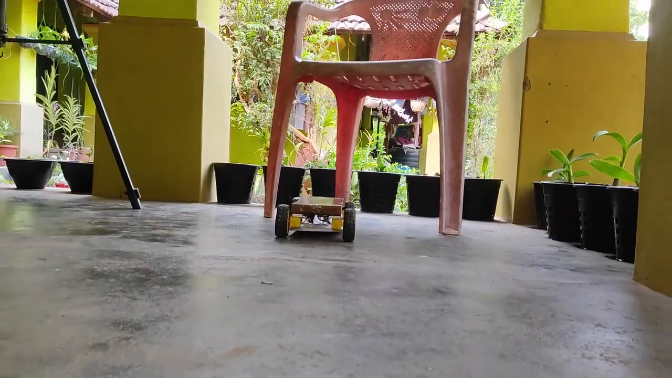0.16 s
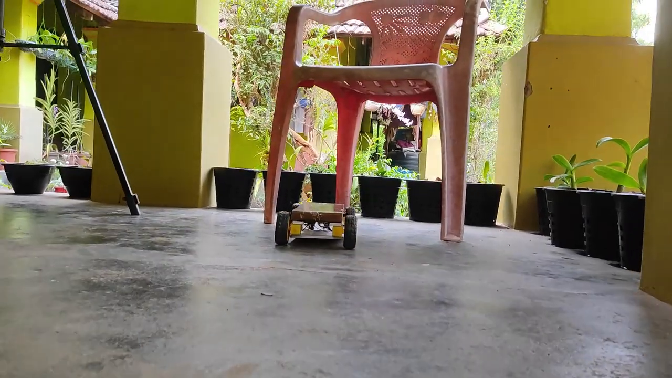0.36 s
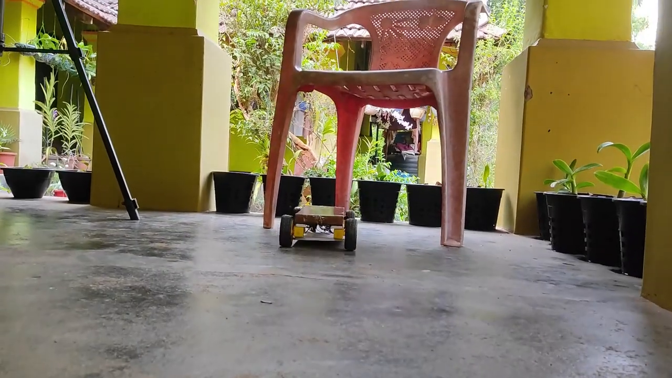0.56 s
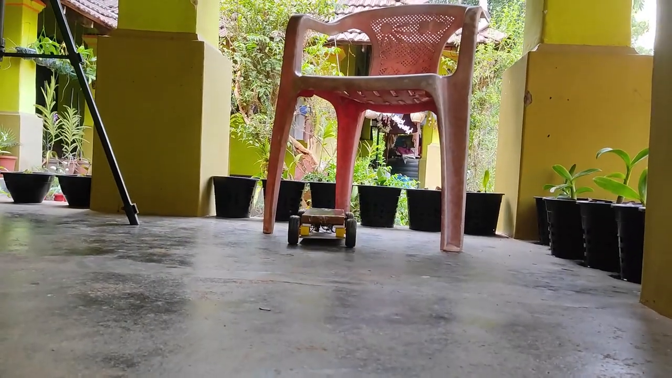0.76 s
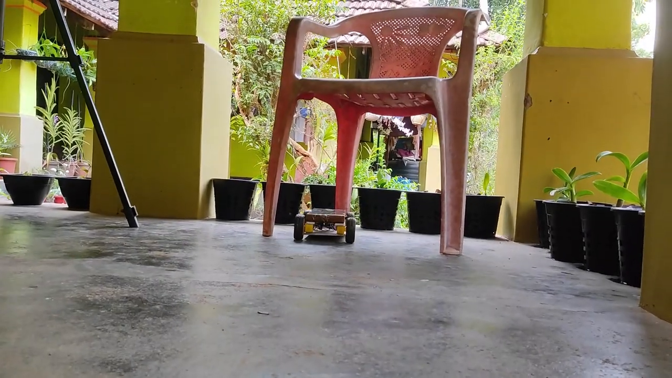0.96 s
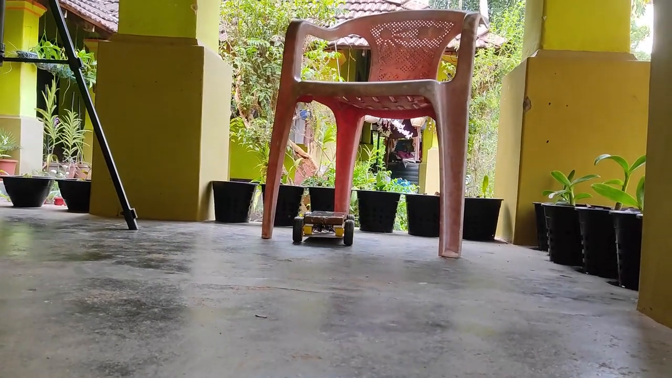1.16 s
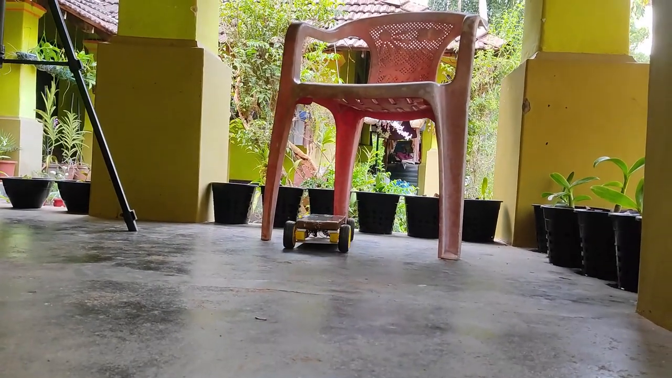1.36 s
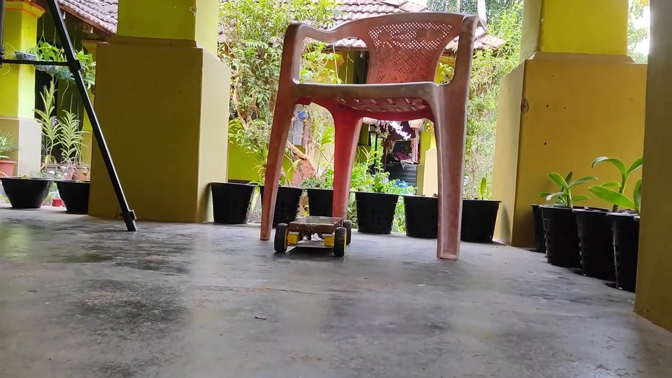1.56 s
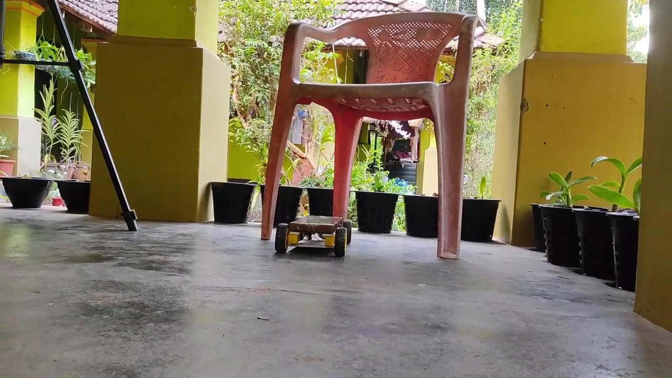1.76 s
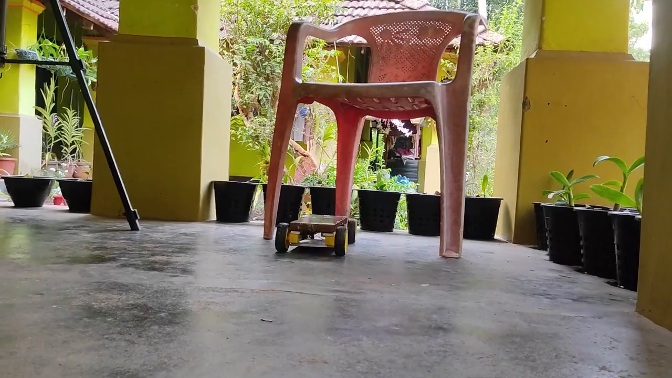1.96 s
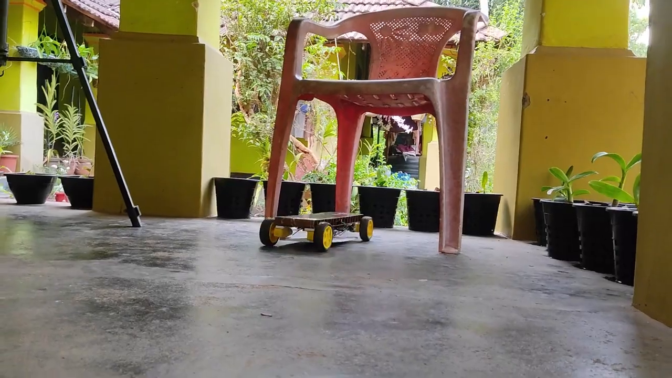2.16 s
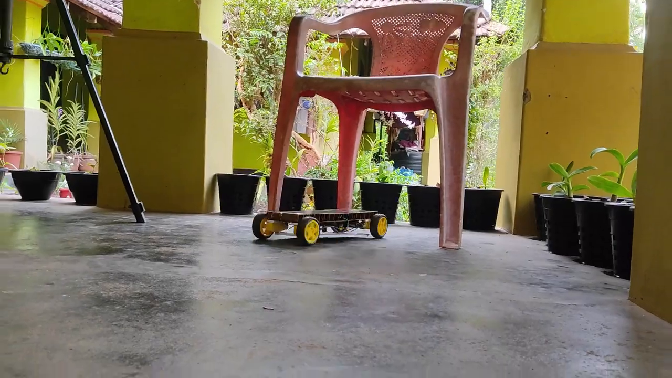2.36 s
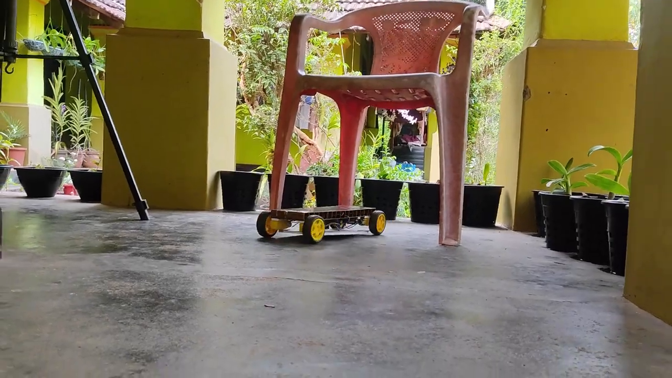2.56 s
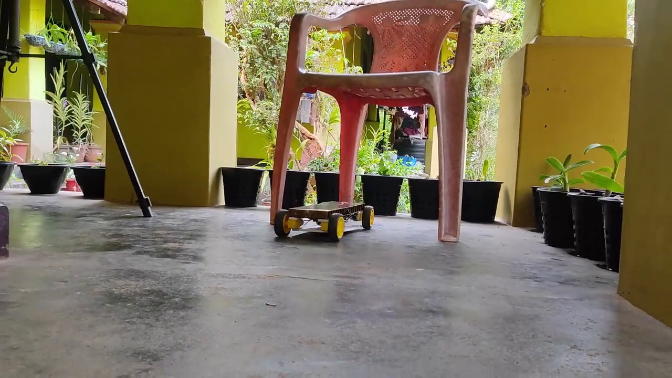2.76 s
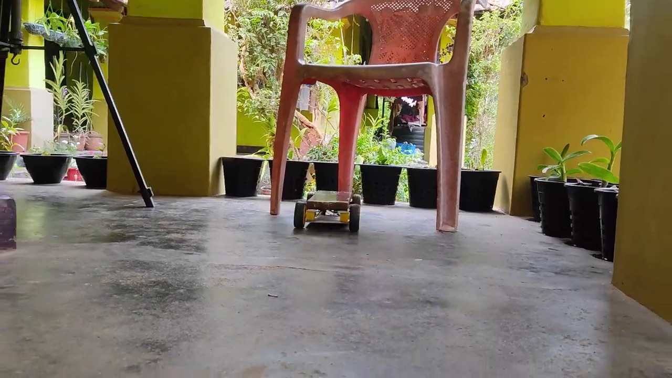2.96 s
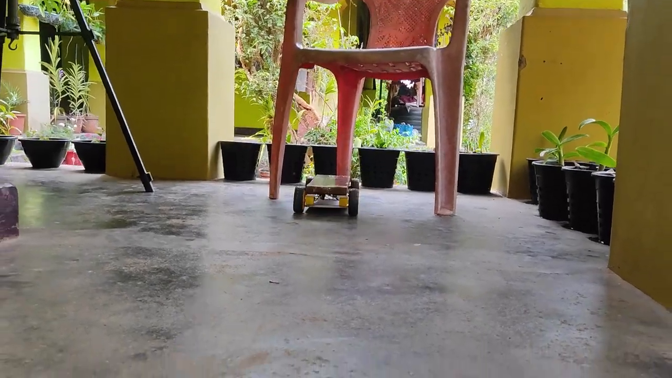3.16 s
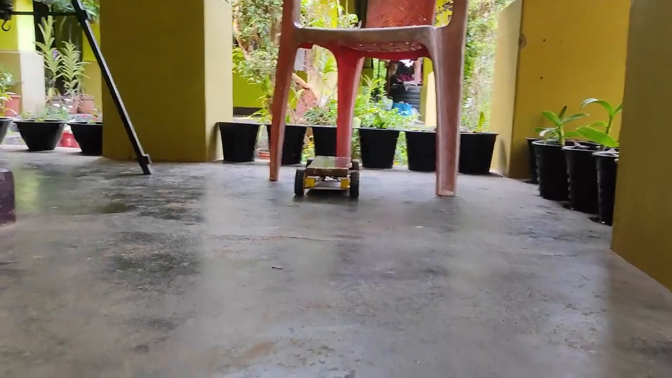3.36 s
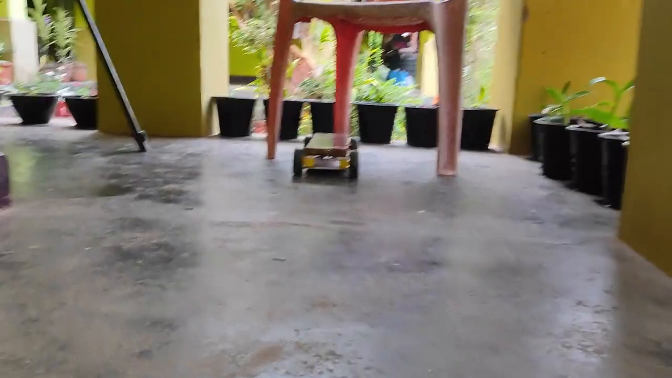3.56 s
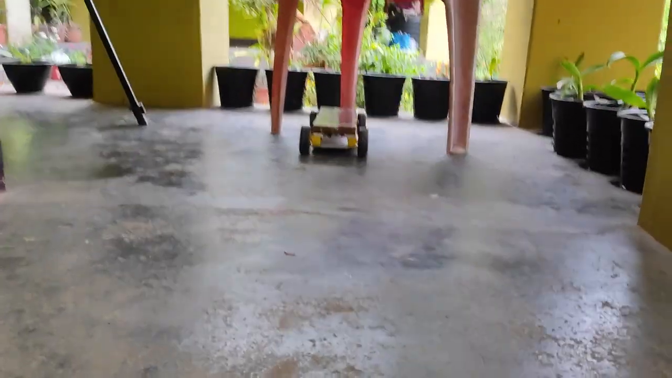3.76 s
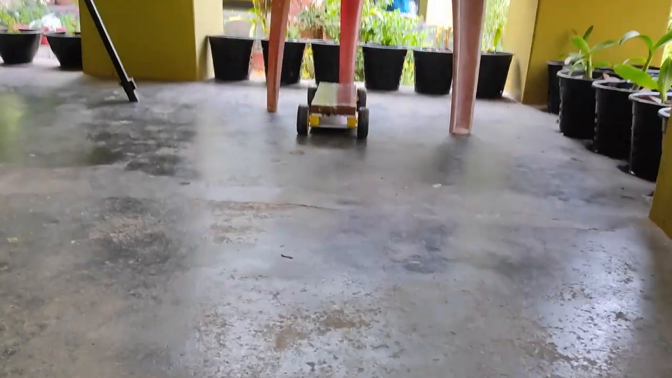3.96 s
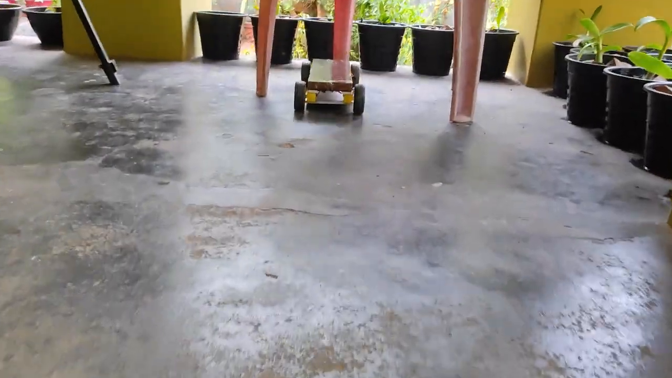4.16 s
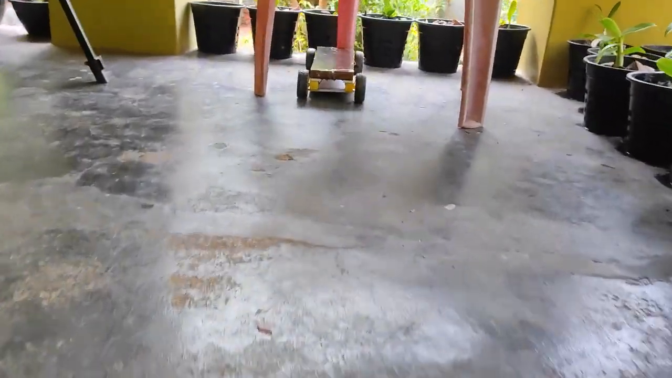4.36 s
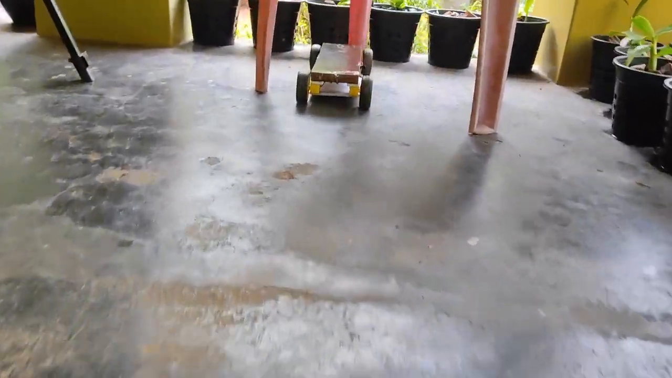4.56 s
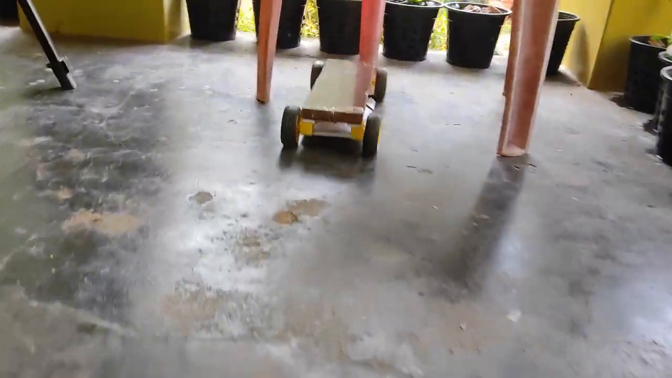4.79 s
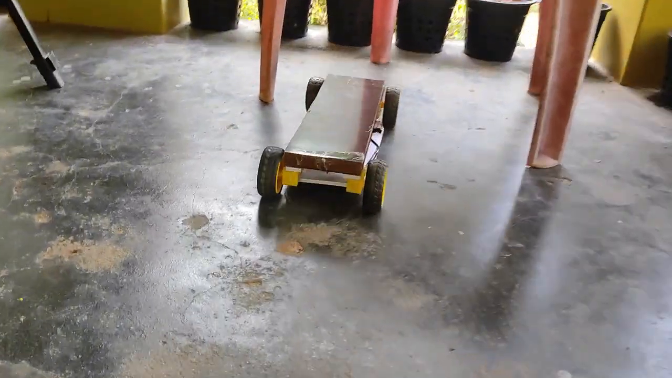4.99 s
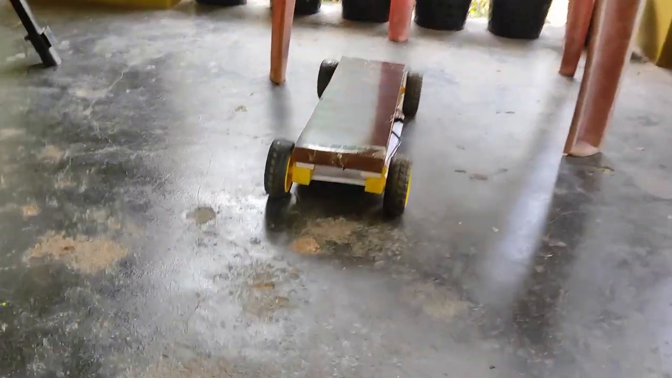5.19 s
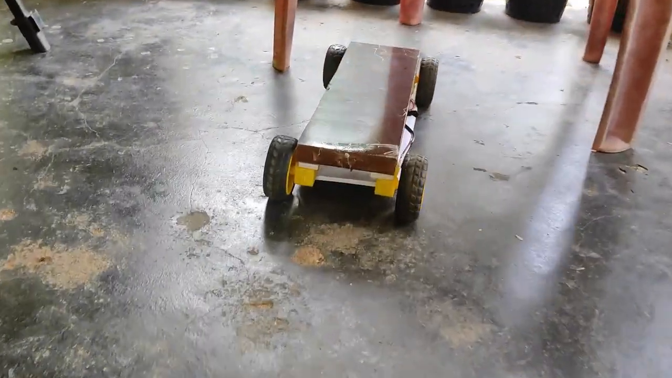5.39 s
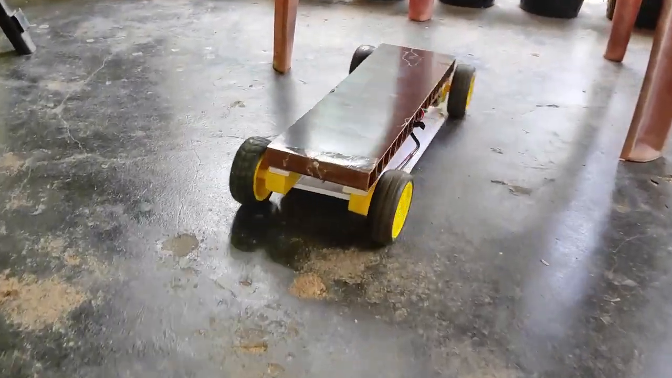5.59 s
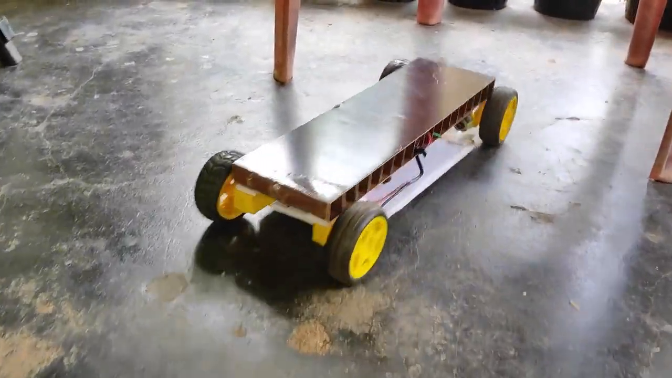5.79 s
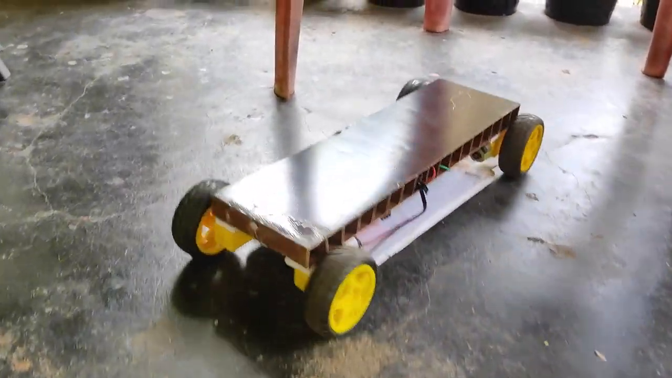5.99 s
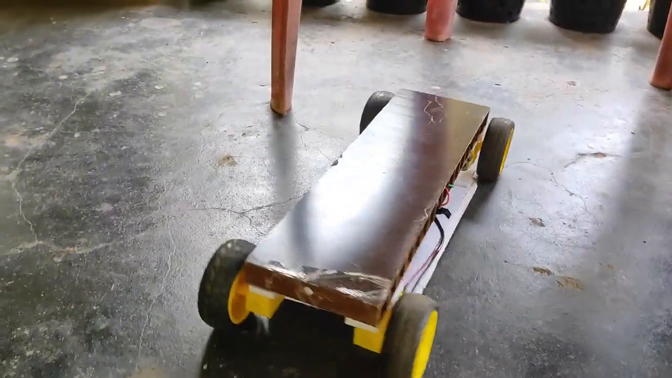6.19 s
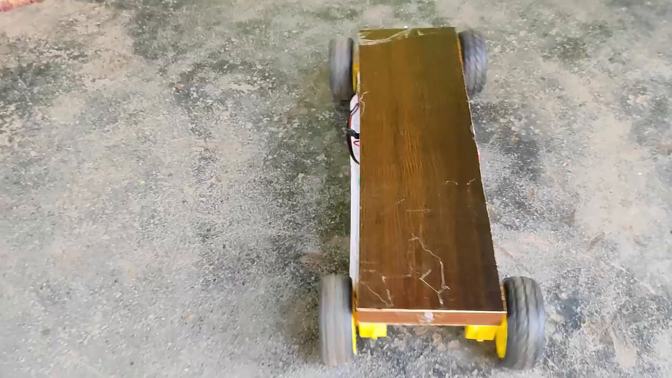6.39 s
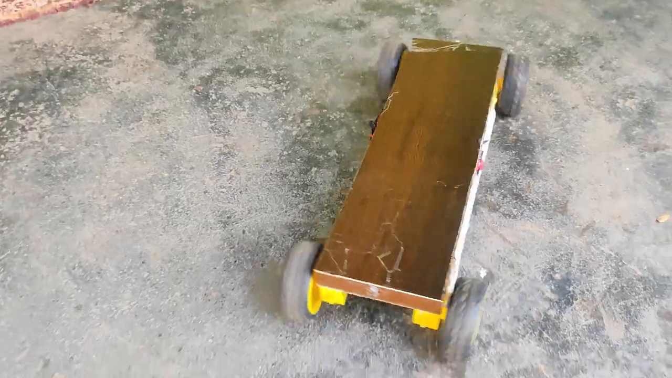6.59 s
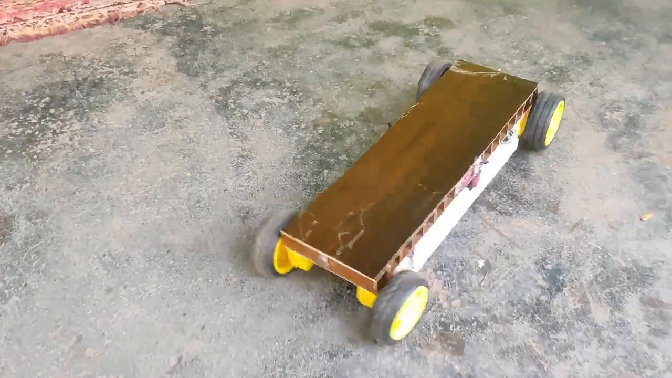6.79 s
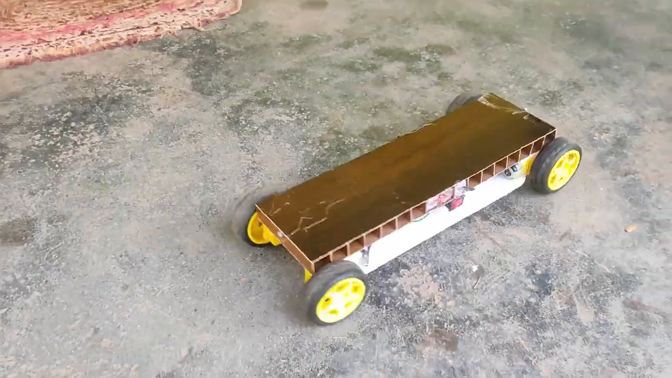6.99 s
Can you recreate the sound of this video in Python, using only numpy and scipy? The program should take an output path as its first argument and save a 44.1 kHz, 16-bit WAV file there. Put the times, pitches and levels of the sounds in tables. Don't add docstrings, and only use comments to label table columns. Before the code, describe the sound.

A small toy-like car with electric gear motors whines and rattles in short bursts on a concrete porch, once knocking a hollow plastic chair.

```python
import sys
import numpy as np
from scipy import signal
from scipy.fft import rfft, irfft, next_fast_len
from scipy.io import wavfile
from scipy.ndimage import uniform_filter1d

SR = 44100
rng = np.random.default_rng(int(sys.argv[2]) if len(sys.argv) > 2 else 0)


def digitize_waveform(pressure):
    field = np.atleast_2d(pressure).T
    bounded = np.clip(field, -1, 1)
    quanta = np.round(bounded * 32767).astype(np.int16)
    wavfile.write(sys.argv[1], SR, quanta)


def ratio(d):
    e = np.asarray(d, float) / 20
    return 10 ** e


N = 310464
TIME = np.arange(N) / SR

# f/Hz, level per Hz/dB
STREET = [(50, -33.5), (85, -7), (473, -22.5), (537, -20.5), (741, -22), (1090, -23.5), (1320, -29),
          (1440, -27.5), (4120, -35), (5450, -40.5), (7680, -40.5), (8550, -66), (14300, -51)]
STREET_DB = -61
# f/Hz, correlation/1
LIKENESS = [(60, -0.17), (230, 0.94), (910, 0.21), (3570, -0.52), (14000, -0.03)]
HUM_HZ, HUM_WIDTH_HZ = 49, 18
HUM_DB, WIND_DB, SELF_NOISE_DB = -61, -60.5, -75.5
# t/s, level/dB
INSECT = [(0, -105), (.3, -85), (1.8, -80), (3.2, -77), (3.6, -70), (3.9, -74.5), (5.3, -68.5),
          (7.04, -84.5)]
# t/s, length/s, start f/Hz, end f/Hz, level/dB
BIRDS = [
    (0, 0.33, 1175, 1373, -70),
    (0.239, 0.14, 796, 884, -68.5),
    (.26, 0.44, 2770, 2720, -76.5),
    (.3, 0.14, 1125, 1180, -71),
    (0.338, 0.27, 3180, 3120, -72.5),
    (0.404, 0.1, 2200, 2060, -69),
    (1.75, 0.325, 2900, 2800, -77.5),
    (3.43, 0.15, 1630, 1550, -74),
    (3.402, 0.42, 789, 817, -72.5),
]
# t/s, length/s, start f/Hz, end f/Hz, level/dB
HOARSE_BIRDS = [
    (0, 0.17, 3450, 3700, -75.5),
    (0.031, 0.083, 2730, 2800, -74),
    (3.41, 0.13, 3940, 3630, -67),
    (3.42, 0.22, 2730, 2730, -72),
    (5.34, 0.15, 3540, 3470, -65),
    (5.349, 0.19, 2600, 2590, -69.5),
    (5.34, .13, 5520, 5510, -73),
]
# t/s, length/s, start f/Hz, end f/Hz,
# level/dB
SHUFFLES = [
    (2.8, 0.181, 280, 140, -60.5),
    (2.826, 0.14, 330, 450, -57),
    (5.211, 0.045, 600, 320, -58.5),
    (4.52, 0.1977, 270, 100, -43),
]
# t/s, level/dB, length/s
TICKS = [
    (0.115, -50, 0.0014),
    (1.698, -50.5, 0.0083),
    (3.007, -30, 0.012),
    (3.456, -54.5, 0.036),
    (3.58, -56, 0.02),
    (3.96, -43.5, 0.015),
    (5.391, -61, 0.055),
]

# on t/s, off t/s, chassis level/dB, deck mode level/dB, hiss level/dB
POWERED = [
    (0.48, 0.979, -42, -42, -41),
    (0.984, 1.508, -43, -45.5, -44.5),
    (1.975, 2.482, -42, -40.5, -44.5),
    (2.499, 2.982, -42, -45, -47),
    (3.971, 4.475, -43, -42.5, -45.5),
    (4.524, 5.021, -41, -43.5, -44.5),
    (5.477, 5.965, -37.5, -35, -39.5),
    (5.998, 6.429, -36.5, -32, -40),
    (6.397, 6.802, -40.5, -26, -50),
    (6.759, 7.04, -39.5, -28.5, -48),
]
KICK_S, KICK_DB, SPIN_UP_S, SPIN_UP_DB = 0.031, 16, 0.074, 8
COAST_DB, COAST_S, HALT_DB_PER_S = 24.5, 0.099, 291
HALTS = [1.1, 1.715, 2.6, 3.07, 4.62, 5.15, 6.1, 6.5, 6.9, 7.2]
HISS_SPIN_UP, HISS_COAST = 1.82, 1.098
DECK_SPIN_UP, DECK_COAST = 0.83, 0.58
CAR_PAN_DB, PAN_SPIN_UP, PAN_COAST = -1.5, 0.2, -0.2
PICK_UP_S, PICK_UP_DB = 0.22, 12
# engage t/s, let go t/s, first order level/dB, third order level/dB, fifth order level/dB
LOADED = [(.585, .997, -36.5, -32.5, -37), (1.049, 1.521, -27.5, -38, -38.5), (2.051, 2.288, -41, -38, -43),
          (2.33, 2.49, -44.5, -35, -42.5), (2.532, 2.995, -31, -36.5, -36.5),
          (4.09, 4.484, -39.5, -33.5, -39), (4.556, 5.009, -27, -35, -35),
          (5.562, 5.965, -49, -24.5, -42.5), (6.109, 6.43, -25, -30.5, -30),
          (6.477, 6.763, -27.5, -29, -38.5), (6.806, 7.041, -28.5, -31.5, -38.5)]
# first order level/dB, third level/dB, fifth level/dB
TURNING = [(-5.5, -7, -10), (3, 6, 3.5), (-2, 0, -9), (9, 6, 6), (11, -1, -1.5), (2, 1, 0.5), (3, 1.5, 0),
           (-16, 1.5, -2), (-1.5, -10.5, 9), (-1, 0, -5), (-2, -1.5, 1)]
ENGAGE_S = 0.015
LET_GO_DB_PER_S = [
    [898],
    [380],
    [479],
]
# t/s, mesh f/Hz
SPEED = [
    [(.585, 1440), (.621, 1484), (.997, 1495)],
    [(1.058, 1406), (1.232, 1410), (1.362, 1459), (1.482, 1482), (1.52, 1402)],
    [(2.04, 1475), (2.074, 1414), (2.284, 1402)],
    [(2.33, 1463), (2.466, 1418), (2.505, 1447)],
    [(2.53, 1382), (2.712, 1427), (2.864, 1403), (2.974, 1442)],
    [(4.085, 1445), (4.271, 1503), (4.47, 1447)],
    [(4.562, 1442), (4.626, 1432), (4.84, 1488), (4.97, 1497), (5.01, 1446)],
    [(5.562, 1451), (5.768, 1377), (5.796, 1396), (5.995, 1426)],
    [(6.105, 1438), (6.137, 1489), (6.279, 1412), (6.43, 1413)],
    [(6.47, 1325), (6.785, 1332)],
    [(6.808, 1309), (6.882, 1349), (7.04, 1315)],
]
# speed spread/%, first order of the other motors relative to the loudest, level/dB
UNEVEN = [(.9, -4), (.7, -15), (1.1, -3), (1.1, -3), (.6, -15), (.95, -3), (.6, -14), (1.3, -2), (.75, -14),
          (.9, -10), (1.1, -8)]
# t/s, time constant/s
RUN_DOWN = [
    (1.51, 0.6),
    (2.985, 0.24),
    (4.482, 0.4),
    (5.008, 0.24),
]
# first order L-R level/dB, minor orders level/dB
FACING = [(0, 2), (1.5, 3.5), (-2, 6.5), (-0.5, 2), (-1.5, 2), (4, 2.5), (-1, 1.5), (5, -7.5), (-1, -1),
          (-16, -4.5), (-18, -3)]
# order/1, relative level/dB
WITH_THIRD = [(2, -9), (4, -13.5)]
# order/1, relative level/dB
WITH_FIFTH = [(6, -17), (7, -21), (8, -14), (9, -22)]
# f/Hz, level per Hz/dB
CHASSIS = [(250, -32), (600, -16.5), (1220, -11.5), (1430, 4.5), (1620, -8), (2200, -5), (3000, -3),
           (3700, -0.5), (4300, -2.5), (5000, -5.5), (6300, -7.5), (7500, -6.5), (8600, -11.5), (9400, -37)]
# f/Hz, level per Hz/dB
HISS = [(7500, -26), (8400, 5), (9900, -6.5), (12000, -6), (14200, -14.5), (14600, -59)]
DECK_HZ, DECK_WIDTH_HZ = 1680, 450
# t/s, length/s, start f/Hz, end f/Hz, level/dB
SQUEAL = [
    (2.98, .055, 4200, 3700, -43),
    (5.562, 0.1, 3600, 3420, -30.5),
    (6.52, 0.18, 3700, 5780, -48),
    (6.81, 0.38, 5300, 5800, -43),
    (6.56, .48, 6750, 6450, -43),
    (3.96, 0.24, 890, 1110, -59),
    (5.06, 0.12, 854, 603, -55.5),
]
# t/s, share/1
GRAZING = [(0, 0.97), (3.5, 0.67), (4.0, 0.57), (6.0, 0.54), (6.2, 0.76), (6.43, 0.34), (6.47, 0.2),
           (7.04, 0.25)]
# f/Hz, level/dB
FLOOR_NOTCH = [(20, 0), (8100, 0), (8400, -15), (9000, -20), (9550, -15), (9850, 0)]
# f/Hz, phase/rad
MIC_LEAD = [(0, 0), (3190, 0.5353), (8960, 3.5), (10700, 9), (11900, 8), (14100, -1.5)]
# f/Hz, L-R level/dB
MIC_TILT = [(1500, 1), (2500, -2.5), (4300, -4.5), (6500, -8), (9000, -2.5), (12500, -6.5)]
PORCH_T60_S, PORCH_DB = .24, -12
# t/s, peak level/dB
BUMPS = [
    (4.403, -17.5),
    (4.431, -43),
    (4.461, -19),
    (4.49, -16),
    (4.5, -32.5),
    (4.516, -30),
    (4.539, -31),
    (4.589, -31),
]
# f/Hz, level/dB, T60/s
CHAIR = [(112.2, -22, 0.25), (205.8, -4, 0.25), (298.9, -9.5, 0.065), (356, -4.5, 0.14), (420, -7, 0.046),
         (497, -6, 0.051), (563, -9, 0.032), (654, 5.5, 0.014), (710, -0.5, 0.025), (900, 4, 0.015),
         (950, -1, 0.018), (1170, 1, 0.014), (1550, 2.5, 0.011), (1960, 6, 0.011), (2600, 2, 0.011),
         (3340, -2, .008)]
# f/Hz, level/dB
MIC = [(20, 2.5), (60, 0), (110, -3.5), (220, 0), (14300, 0.5), (14420, -50)]
CUT_S, RESUME_S, FADE_S = 6.43, 6.469, 0.022


def rms_one(x):
    return x / np.sqrt(np.mean(x ** 2) + 1e-20)


def in_time(tables):
    return np.interp(TIME, *np.transpose(np.concatenate(tables)))


def per_burst(rows):
    burst = np.searchsorted([row[0] for row in LOADED], TIME, side="right") - 1
    return np.array(rows)[np.clip(burst, 0, None)].T


def short_of(since, length):
    return np.clip(1 - since / length, 0, 1)


def at_hz(points, hz):
    table_hz, values = np.transpose(points)
    return np.interp(np.log(hz + 1), np.log(table_hz), values)


def shaped(x, points, as_gain=ratio):
    size = next_fast_len(N + 8192)
    gain = as_gain(at_hz(points, np.fft.rfftfreq(size, 1 / SR)))
    return irfft(rfft(x, size) * gain, size)[..., :N]


def banded(x, order, hz, kind):
    return signal.sosfilt(signal.butter(order, hz, kind, fs=SR, output="sos"), x)


def drift(rate):
    r = np.exp(-16 * np.pi * rate / SR)
    noise = rng.standard_normal(N // 8 + 4002)
    slow = signal.lfilter([1], [1, -2 * r, r * r], noise)[4000:]
    return np.interp(np.arange(N) / 8, np.arange(len(slow)), rms_one(slow))


def pair(alike):
    shared, left, right = rng.standard_normal((3, N))
    alike = np.clip(alike, 0, 1)
    return np.sqrt(alike) * shared + np.sqrt(1 - alike) * np.array([left, right])


def panned(x, pan_db):
    gains = ratio(np.array([pan_db, -pan_db]) / 2)
    return x * gains / gains.mean(axis=0)


def street():
    shared, left, right = shaped(rng.standard_normal((3, N)), STREET)
    alike = shaped(shared, LIKENESS, lambda c: np.sqrt(np.clip(c, 0, 1)))
    apart = shaped(np.array([left, right]), LIKENESS, lambda c: np.sqrt(1 - np.clip(c, 0, 1)))
    return ratio(STREET_DB + 1.23 + 0.19 * drift(0.28)) * rms_one(alike + apart)


def hum():
    wavering = 0.76 + 0.76 * drift(HUM_WIDTH_HZ)
    drone = ratio(HUM_DB) * wavering * np.sin(2 * np.pi * HUM_HZ * TIME) * np.sqrt(2)
    wind = ratio(WIND_DB + 1.2 * drift(1.7)) * rms_one(banded(pair(0.61), 2, [14, 60], "band"))
    sheltered_db = -6 * (TIME > CUT_S)
    return ratio(sheltered_db) * (drone + wind)


def self_noise():
    return ratio(SELF_NOISE_DB + 2.4 * drift(6.6)) * banded(pair(.1), 2, 9000, "high")


def insects():
    band = banded(pair(0.16), 2, [7550, 8100], "band")
    level_db = np.interp(TIME, *np.transpose(INSECT)) + 2.7 * drift(29)
    return ratio(level_db) * rms_one(band)


def hoarse_notes(notes, hoarse_hz):
    out = np.zeros((2, N))
    for s, length, start_hz, end_hz, level_db in notes:
        along = np.clip((TIME - s) / length, 0, 1)
        phase = 2 * np.pi * np.cumsum(start_hz + (end_hz - start_hz) * along) / SR
        port_phase = np.array([[0], [rng.uniform(-1.1, .6)]])
        note = (40 / hoarse_hz + drift(hoarse_hz)) * np.sin(phase + port_phase)
        envelope = np.sin(np.pi * along ** 0.5) ** .5 * (along < 1)
        out += ratio(level_db + 4.0) * envelope * note
    return out


def scuffs():
    envelope = sum(ratio(db) * np.exp(-.5 * ((TIME - s) / length) ** 2) for s, db, length in TICKS)
    return envelope * 0.32 * banded(pair(0.28), 1, 2500, "high")


def power():
    on, off, chassis_db, deck_db, hiss_db = np.transpose(POWERED)[..., None]
    kick = KICK_DB * short_of(TIME - on, KICK_S) + 200 * (TIME < on)
    rise = SPIN_UP_DB * short_of(TIME - on - KICK_S, SPIN_UP_S)
    coast = COAST_DB * (1 - np.exp(-np.clip(TIME - off, 0, None) / COAST_S))
    coast = coast + HALT_DB_PER_S * np.clip(TIME - np.array(HALTS)[:, None], 0, None)
    chassis = chassis_db - kick - rise - coast
    deck = deck_db - kick - DECK_SPIN_UP * rise - DECK_COAST * coast
    hiss = hiss_db - kick - HISS_SPIN_UP * rise - HISS_COAST * coast
    pan = CAR_PAN_DB + PAN_SPIN_UP * rise + PAN_COAST * np.minimum(coast, 30)
    run = chassis.argmax(axis=0)
    levels = [layer[run, np.arange(N)] for layer in (chassis, deck, hiss, pan)]
    return uniform_filter1d(levels, size=120)


def load():
    on, off, *levels_db = per_burst(LOADED)
    along = np.clip((TIME - on) / (off - on), 0, 1) - .5
    engage_db = 20 * np.log10(1.0001 - short_of(TIME - on, ENGAGE_S))
    let_go_db = np.array(LET_GO_DB_PER_S) * np.clip(TIME - off, 0, None)
    levels_db = np.array(levels_db) + per_burst(TURNING) * along + engage_db - let_go_db
    return uniform_filter1d(levels_db, size=100)


def motors(mesh_hz):
    slowing = sum((TIME - s) / lag * (TIME > s) * (TIME < s + .08) for s, lag in RUN_DOWN)
    spread = per_burst(UNEVEN)[0] / 100 + .3 * slowing
    phases = []
    for k in range(4):
        wander = (k > 0) * 1.6 * drift(4) + (.4 + .1 * k) * drift(70)
        speed = mesh_hz * np.exp(-slowing * (.9 + .2 * k)) * (1 + spread * wander)
        phases.append(2 * np.pi * np.cumsum(speed) / SR)
    return phases


def order(phases, multiple, others_db, roughness):
    out = np.zeros((2, N))
    mean_power = (1 + 3 * ratio(others_db) ** 2) * (1 + roughness ** 2)
    for k, phase in enumerate(phases):
        size = ratio(others_db * (k > 0)) * (1 + roughness * drift(130))
        size = size * (1 + .15 * np.cos(phase / 10 + rng.uniform(0, 6)))
        offset = rng.normal(0, 0.6) * np.sqrt(multiple)
        out += size * np.sin(multiple * phase + rng.uniform(0, 6.17) + np.array([[offset], [-offset]]))
    return out * np.sqrt(2 / mean_power)


def whine(phases, first_db, third_db, fifth_db, pan_db):
    first_pan_db, minor_db = per_burst(FACING)
    first = ratio(first_db - .6) * order(phases, 1, per_burst(UNEVEN)[1], roughness=.18)
    upper = ratio(third_db - 2) * order(phases, 3, -5, roughness=.5)
    upper += ratio(fifth_db - 2.5) * order(phases, 5, -4, roughness=.8)
    for led_db, orders in [(third_db, WITH_THIRD), (fifth_db, WITH_FIFTH)]:
        for multiple, db in orders:
            upper += ratio(led_db + minor_db + db) * order(phases, multiple, -3, roughness=.9)
    return panned(first, first_pan_db) + panned(upper, pan_db)


def rattle(phases, chassis_db, deck_db, hiss_db, pan_db):
    turn = 1 + .2 * np.cos(phases[0] / 10) + .3 * np.cos(phases[1])
    teeth = turn * ratio(1.8 * drift(250) + .5 * drift(12))
    w, r = 2 * np.pi * DECK_HZ / SR, np.exp(-np.pi * DECK_WIDTH_HZ / SR)
    deck = teeth * pair(0.36)
    for _ in range(2):
        deck = signal.lfilter([1, 0, -1], [1, -2 * r * np.cos(w), r * r], deck)
    deck = ratio(deck_db - 6.0) * rms_one(deck)
    chassis = ratio(chassis_db + 6.5) * rms_one(shaped(teeth * pair(0.55), CHASSIS))
    hiss = ratio(hiss_db + 5.6) * rms_one(shaped(np.sqrt(teeth) * pair(0.57), HISS))
    wheels = rms_one(banded(pair(1.0), 2, [280, 1050], "band"))
    wheels_db = deck_db - 22.0 - 10.0 * (TIME > CUT_S)
    return ratio(wheels_db) * wheels + panned(chassis + hiss + deck, pan_db)


def along_floor(x):
    share = np.clip(np.interp(TIME, *np.transpose(GRAZING)), 0, 1)
    return share * shaped(x, FLOOR_NOTCH) + (1 - share) * x


def at_ports(x):
    left = shaped(x[0], MIC_LEAD, lambda phase: np.exp(.5j * phase))
    right = shaped(x[1], MIC_LEAD, lambda phase: np.exp(-.5j * phase))
    left = shaped(left, MIC_TILT, lambda db: ratio(db / 2))
    right = shaped(right, MIC_TILT, lambda db: ratio(-db / 2))
    return np.array([left, right])


def porch(x):
    size = next_fast_len(N + SR)
    hz = np.fft.rfftfreq(size, 1 / SR)
    out, spectrum = np.zeros((2, N)), rfft(x.mean(axis=0), size)
    for side, lags in enumerate(rng.uniform(.012, .04, (2, 6))):
        response = 0
        for lag in lags:
            loop = ratio(-60 * lag / PORCH_T60_S * (1 + hz / 8000)) * np.exp(-2j * np.pi * hz * lag)
            response = response + loop / (1 - loop)
        out[side] = irfft(spectrum * response, size)[:N]
    return out


def chair():
    times, peaks_db = np.transpose(BUMPS)
    at, out = (times * SR).astype(int), np.zeros(N)
    strengths = rng.normal(0, 2.5, (len(at), len(CHAIR)))
    shudder = rng.standard_normal(N)
    for k, (hz, level_db, t60) in enumerate(CHAIR):
        clicks = np.full(N, 1e-18)
        clicks[at] = ratio(peaks_db + level_db - 14.5 + strengths[:, k])
        clicks += 0.032 * shudder * signal.lfilter([1], [1, -ratio(-60 / (.25 * SR))], clicks)
        r, w = ratio(-60 / (t60 * SR)), 2 * np.pi * hz / SR
        out += signal.lfilter([0, np.sin(w)], [1, -2 * r * np.cos(w), r * r], clicks)
    return banded(out, 2, 90, "high")


def scene():
    chassis_db, deck_db, hiss_db, pan_db = power()
    phases = motors(in_time(SPEED))
    car = whine(phases, *load(), pan_db) + rattle(phases, chassis_db, deck_db, hiss_db, pan_db)
    pick_up_db = -PICK_UP_DB * short_of(TIME - RESUME_S, PICK_UP_S) * (TIME > CUT_S)
    squeals = panned(hoarse_notes(SQUEAL, 290), pan_db)
    near = at_ports(along_floor(car * ratio(pick_up_db) + squeals)) + chair()
    far = hoarse_notes(BIRDS, 55) + hoarse_notes(HOARSE_BIRDS, 240) + hoarse_notes(SHUFFLES, 114)
    return near + ratio(PORCH_DB) * porch(near) + street() + hum() + insects() + far + scuffs()


def band_limit(x):
    return signal.sosfilt(signal.butter(12, 14380, fs=SR, output="sos"), x)


def record(dry):
    before = np.clip((CUT_S - TIME) / .012, 0, 1)
    after = np.clip((TIME - RESUME_S) / FADE_S, 0, 1) ** .5
    mix = (shaped(dry, MIC) + self_noise()) * (before + after)
    return band_limit(mix)


dry = scene()
out = record(dry)
digitize_waveform(out)
```